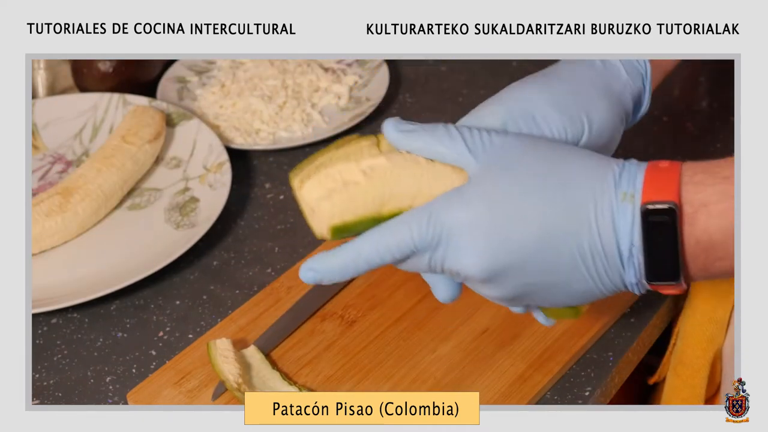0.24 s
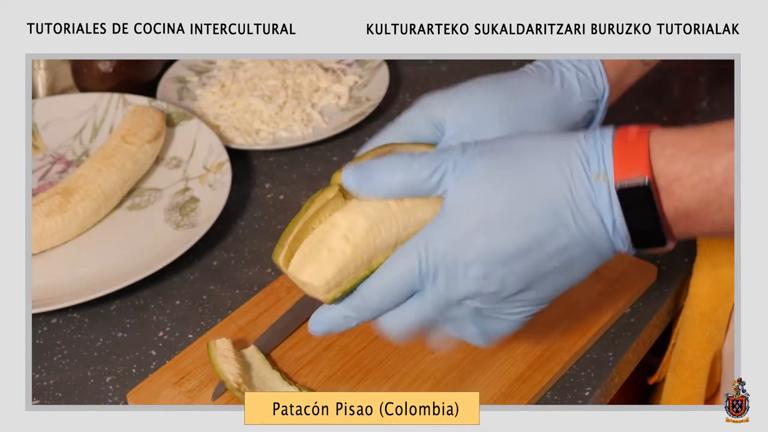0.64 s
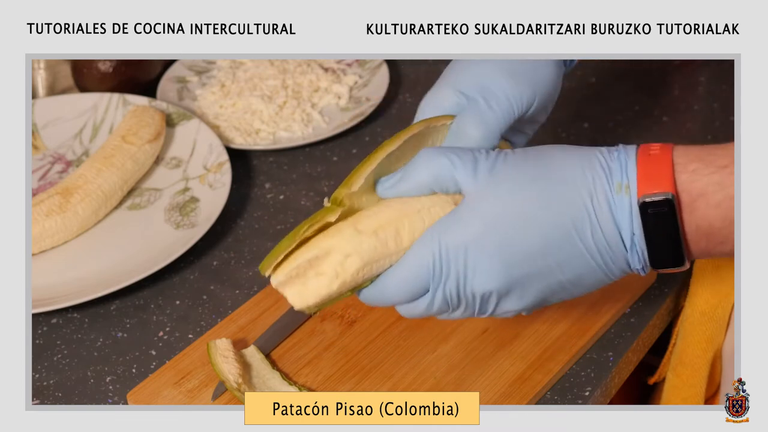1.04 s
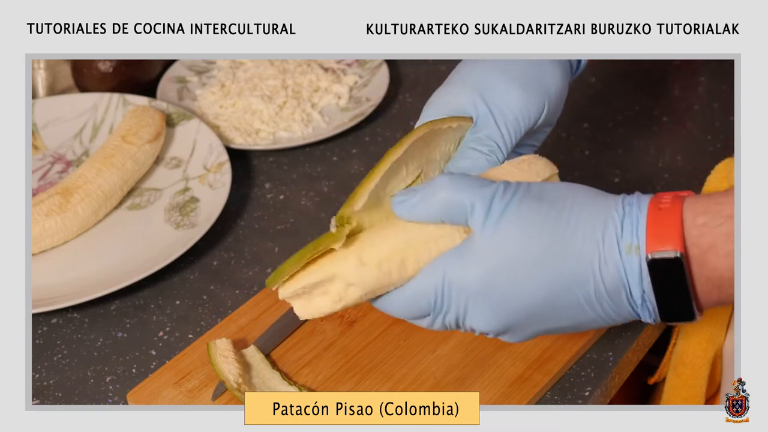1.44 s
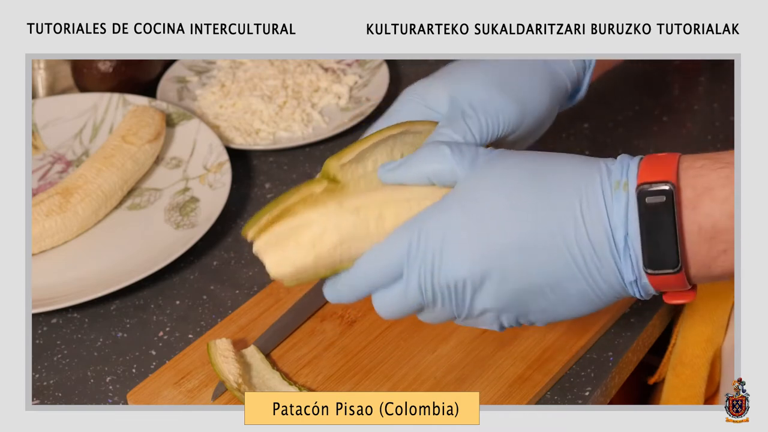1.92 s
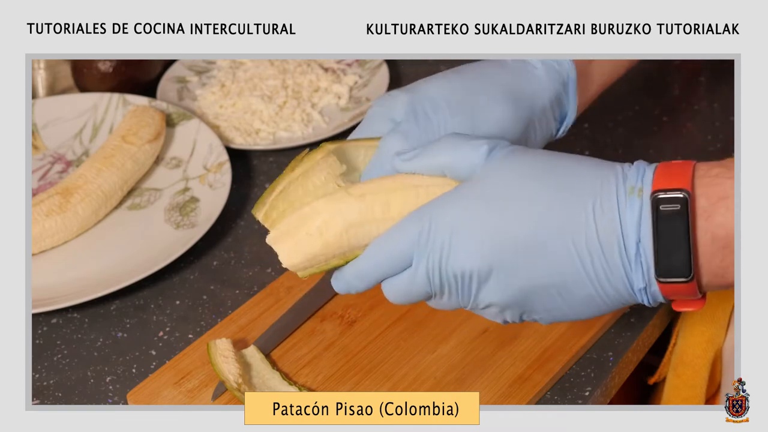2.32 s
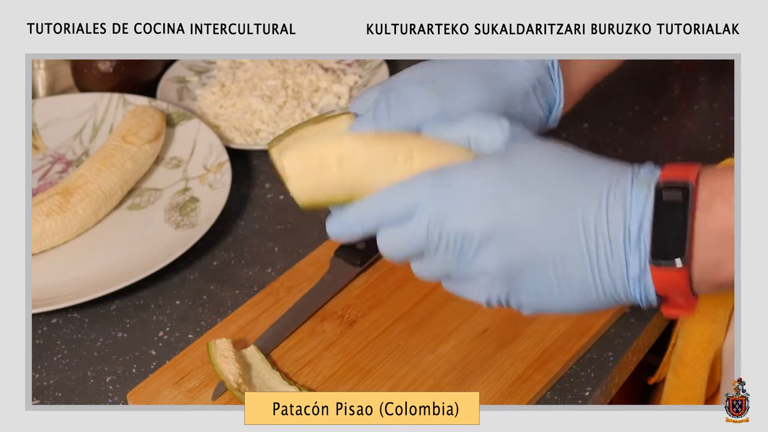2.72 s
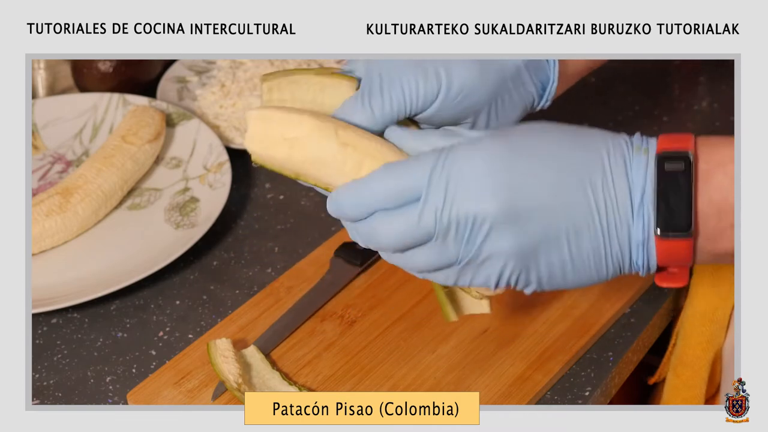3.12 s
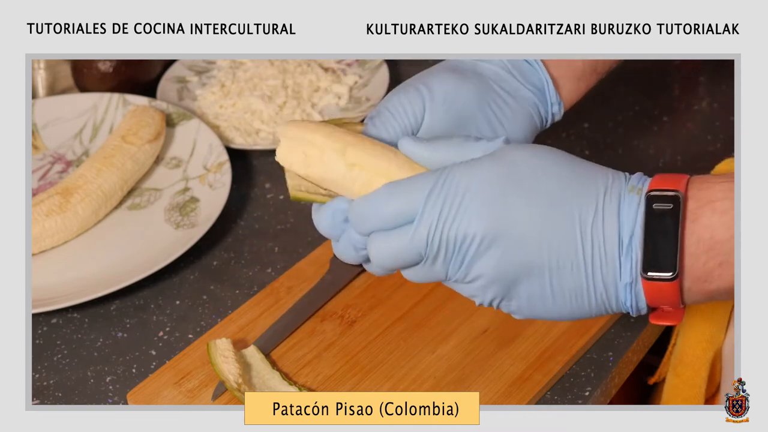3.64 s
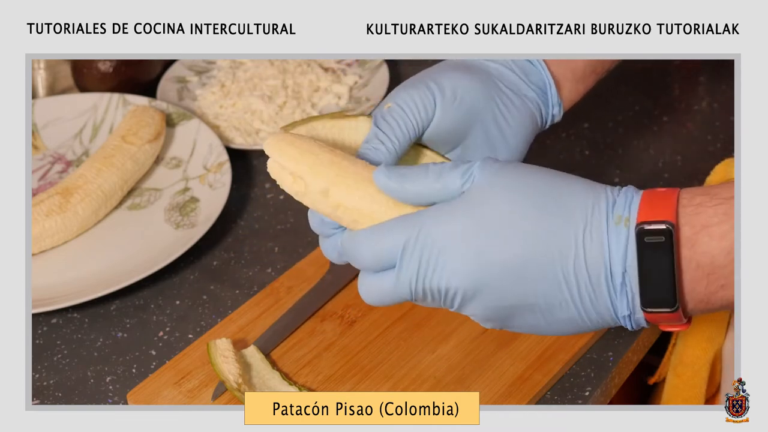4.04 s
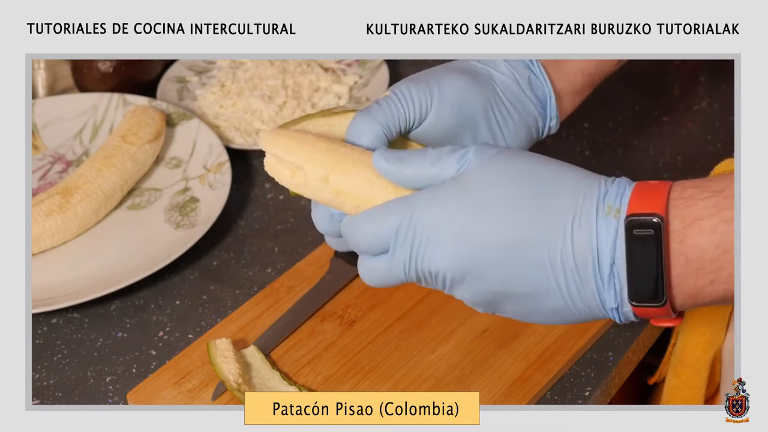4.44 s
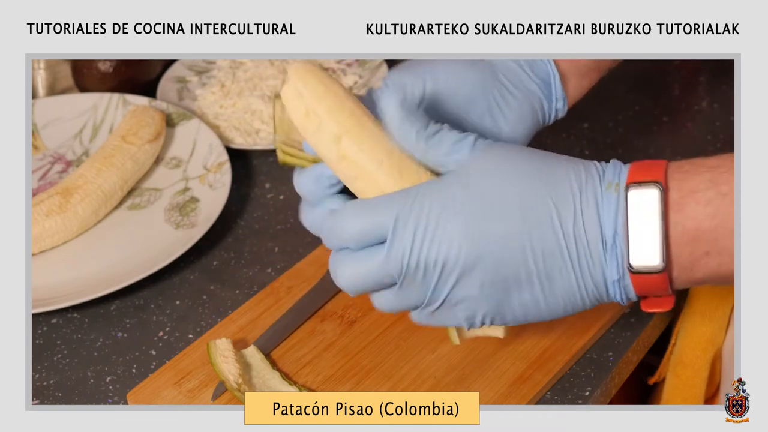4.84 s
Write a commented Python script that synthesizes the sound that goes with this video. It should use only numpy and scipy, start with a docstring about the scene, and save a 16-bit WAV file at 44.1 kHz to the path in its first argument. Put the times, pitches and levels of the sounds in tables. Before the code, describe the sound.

Stiff plantain skin is pried off by rubber-gloved hands, with crisp little snaps, short tearing crackles and soft glove rubs over faint room hum.

```python
"""Gloved fingers pry the stiff skin off a green plantain, close up in a small kitchen with a faint hum. First
the gloves rub and a strip tears loose, ringing lower as it grows: random breaks through a gliding resonance.
Throughout, fibres snap (noise cracks over damped skin modes) and bundles rip (short avalanches of breaks), most
densely between one and one and a half seconds. Around two seconds the hands bump the fruit (swelling sines) and
the gloves judder, then comes the heaviest snap. Crackling pulls and scattered snaps follow to the end; fading
noise tails answer as the room throughout."""
import sys
import numpy as np
from scipy import signal
from scipy.fft import rfft, irfft, next_fast_len
from scipy.io import wavfile
from scipy.ndimage import map_coordinates

SR = 44100
rng = np.random.default_rng(int(sys.argv[2]) if len(sys.argv) > 2 else 0)


def log_audio(samples):
    """Write samples as a 16-bit WAV file to the path given in sys.argv[1]."""
    # one column per channel
    frames = np.atleast_2d(samples).T
    # limit to full scale, then quantise
    limited = np.clip(frames, -1, 1)
    pcm = np.round(limited * 32767).astype(np.int16)
    wavfile.write(sys.argv[1], SR, pcm)


N = 223986  # length [samples]


def amp(db):
    """Decibels to gain."""
    return 10 ** (np.asarray(db) / 20)


def unit(x):
    """Scale to rms 1."""
    return x / np.sqrt(np.mean(x ** 2) + 1e-20)


def along(points, hz):
    """Read a curve of (frequency [Hz], value) points on a log frequency axis."""
    f, v = np.transpose(points)
    return np.interp(np.log(hz + 1), np.log(f + 1), v)


def wobble(rate):
    """A smooth random curve with rate knots a second."""
    knots = rng.standard_normal(int(N * rate / SR) + 4)
    return map_coordinates(knots, [np.arange(N) * rate / SR])


def filtered(x, response):
    """Shape x by a response given as a function of frequency."""
    m = next_fast_len(N + SR // 2)
    return irfft(rfft(x, m) * response(np.fft.rfftfreq(m, 1 / SR)), m)[:N]


def coloured(x, spectrum, size=2048):
    """Colour x with a causal minimum-phase filter of energy 1 that follows this spectrum."""
    cepstrum = irfft(np.log(amp(along(spectrum, np.fft.rfftfreq(size, 1 / SR)))))
    # folding the cepstrum forward in time puts the energy at the onset
    cepstrum[1:size // 2] *= 2
    cepstrum[size // 2 + 1:] = 0
    kernel = irfft(np.exp(rfft(cepstrum)))
    return signal.fftconvolve(x, kernel / np.linalg.norm(kernel))[:len(x)]


def resonated(x, hz, width_hz):
    """Ring x through one resonance, which may glide; about as strong as x."""
    turn = np.exp(2j * np.pi * np.cumsum(hz * np.ones(len(x))) / SR)
    pole = np.exp(-np.pi * width_hz / SR)
    ringing = turn * signal.lfilter([1], [1, -pole], x / turn)
    return np.sqrt(2 * (1 - pole ** 2)) * ringing.imag


def add(track, s, sound):
    """Mix a sound into the track at time s."""
    part = track[max(round(s * SR), 0):][:len(sound)]
    part += sound[:len(part)]


def fractures(size, per_second, spread_db):
    """Tiny breaks at random moments and of uneven sizes, rms 1."""
    happens = rng.random(size) < per_second / SR
    strength = amp(spread_db * np.clip(rng.standard_normal(size), -2, 2))
    return unit(happens * strength * rng.choice([-1, 1], size))


# the loudest single fibres breaking:
# (time [s], body level [dB], crack level [dB], crack brightness [dB per octave])
FIBRE_SNAPS = [(0.0499, -50, -45, -6.5), (0.283, -65, -44, 12), (0.321, -54, -49, 3),
               (0.363, -62, -47.5, 1), (0.5145, -28.5, -35, -9), (0.7845, -49, -52, -3),
               (0.9011, -51, -52, 0), (0.9374, -51, -50.5, 5), (1.0147, -50, -42, 0),
               (1.0222, -38, -38, -4), (1.0375, -41.5, -49, 6), (1.0686, -46, -54, 6),
               (1.111, -31, -37.5, -2), (1.1345, -34, -34.5, -2), (1.141, -44, -46, -8),
               (1.162, -31.5, -35, -1), (1.2138, -47, -50, -5), (1.2198, -40.5, -48, -6),
               (1.2395, -40, -38.5, 4), (1.2607, -40.5, -40, 0), (1.5098, -43, -47, -12),
               (1.517, -31.5, -38.5, -1), (1.5236, -37, -37.5, 1), (1.5522, -42.5, -53, -3),
               (2.283, -43, -39, 1), (2.3144, -21.5, -32.5, 0), (2.329, -52, -34.5, 1),
               (2.7001, -50, -44.5, 3), (2.729, -35.5, -40, 11), (3.2556, -45.5, -36, -5),
               (3.2709, -48, -38.5, -7), (3.294, -46, -40, 2), (3.304, -44, -33, -7),
               (3.3297, -49, -40, -2), (3.599, -56, -39, 3.5), (3.607, -59, -41.5, -2),
               (3.6469, -44, -49, 3), (3.7167, -45, -51, 2), (4.2345, -51.5, -58, 2), (4.303, -67, -49, 12),
               (4.5753, -49, -32.5, -5.5), (4.6336, -41, -39.5, -5), (4.6495, -47, -45.5, 0),
               (5.004, -50.5, -49, -2), (5.043, -53, -49.5, -2)]
# modes of the skin flexing as it lets go, before scatter and focus:
# (frequency [Hz], level [dB], decay by 60 dB [s])
SKIN_MODES = [(716, -3, 0.015), (1290, 3.5, 0.0075), (1850, 0.5, 0.0074), (2290, 5, 0.0028),
              (2860, 0.5, 0.012)]
# colour of a breaking fibre: (frequency [Hz], relative density [dB per Hz])
CRACK_COLOUR = [(300, -55), (900, -19.5), (2000, -7), (3300, 5), (4800, 2.5), (6000, 9), (7100, 4.5),
                (8800, 6), (12000, 1.5), (16000, -13)]
# a harder snap frees a bigger piece, which sounds lower:
# centre of the body [Hz] at a middling strength [dB], and its fall [octaves per dB]
PIECE_HZ, PIECE_DB, PIECE_OCTAVES_PER_DB = 1500, -39, 0.028


def snaps(rise=.0005, crack_t60=0.0039, splinter_db=-18, splinter_t60=0.041, pivot_hz=7000,
          pitch_scatter=0.043, focus_db=6, low_hz=400):
    """Each fibre breaks with a sharp crack and kicks the heavily damped skin."""
    out, t = np.zeros(N), np.arange(SR // 25) / SR
    blow_samples = .003 * SR
    # the skin is a small radiator and gives little bass
    small_radiator = signal.butter(2, low_hz, "highpass", fs=SR)

    def as_blow(x):
        """Scale to rms 1 as if it all fell within 3 ms."""
        return x * np.sqrt(blow_samples) / np.linalg.norm(x)

    # the break runs across the fibre, then the cell walls beside it splinter
    decay = amp(-60 * t / crack_t60) + amp(splinter_db - 60 * t / splinter_t60)
    breaking = (1 - np.exp(-t / rise)) * decay
    for s, body, crack, brightness in FIBRE_SNAPS + thin_fibres():
        # the size of the broken piece decides which modes take the kick
        centre = PIECE_HZ * 2 ** (PIECE_OCTAVES_PER_DB * (PIECE_DB - body))
        flex = np.zeros(len(t))
        for hz, db, t60 in SKIN_MODES:
            level = db + rng.normal(0, 1) - focus_db * np.log2(hz / centre) ** 2
            pitch = hz * np.exp(pitch_scatter * rng.normal())
            flex += amp(level - 60 * t / t60) * np.sin(2 * np.pi * pitch * t)
        add(out, s, amp(body) * as_blow(signal.lfilter(*small_radiator, flex)))
        # each fibre tilts the crack colour about the pivot
        spectrum = [(hz, db + brightness * np.log2(hz / pivot_hz)) for hz, db in CRACK_COLOUR]
        noise = breaking * rng.standard_normal(len(t))
        add(out, s - rise, amp(crack) * as_blow(coloured(noise, spectrum)))
    return out


# pulls on the skin: (start [s], length [s], crackle level before the trim in peeling [dB])
SKIN_PULLS = [(0.02, 0.058, -56.5), (0.295, .13, -56.5), (0.45, 0.076, -49.5), (0.665, 0.024, -59.5),
              (0.9, 0.28, -64.5), (1.225, 0.023, -51), (2.195, 0.049, -50.5), (2.68, 0.12, -59.5),
              (3.22, .12, -58), (3.52, 0.081, -61), (4.305, 0.068, -61.5), (4.515, 0.076, -57.5),
              (4.995, 0.046, -58)]
# how often thin fibres part during a pull [per s], body and crack over the pull's level [dB],
# brightness [dB per octave], and range from the weakest to the strongest [dB]
THIN_PER_S, THIN_BODY_DB, THIN_CRACK_DB, THIN_DB_PER_OCTAVE = 40, -1.5, 1, 2.5
THIN_SPREAD_DB = 5


def thin_fibres():
    """Thin fibres part at random over each pull: faint snaps, as rows like those of FIBRE_SNAPS."""
    rows = []
    for start, length, db in SKIN_PULLS:
        chances = rng.random((40, 3))
        for place, happens, size in chances:
            if happens < THIN_PER_S * length / len(chances):
                level = db + THIN_SPREAD_DB * (size - .5)
                rows.append((start + place * length, level + THIN_BODY_DB, level + THIN_CRACK_DB,
                             THIN_DB_PER_OCTAVE))
    return rows


# bundles of fibres giving way: (time [s], length [s], body level [dB], crack level [dB],
# ring of the freed strip [Hz], ring level [dB])
BUNDLE_RIPS = [(0.509, 0.0086, -30.5, -43, 1830, -43.5), (1.142, 0.0066, -42, -45, 6040, -39.5),
               (1.232, 0.022, -52, -65, 2030, -46.5), (1.514, 0.018, -47, -60, 1320, -39),
               (2.326, 0.01, -38, -48, 1200, -38), (2.708, 0.021, -50.5, -44.5, 4600, -47.5),
               (2.724, 0.019, -46, -36.5, 4370, -42.5), (2.751, 0.024, -48, -48.5, 1430, -83),
               (3.297, 0.0098, -48, -47, 6450, -47.5), (3.326, 0.0049, -42.5, -36.5, 6600, -40.5),
               (3.626, 0.0061, -40.5, -39.5, 8700, -66), (3.636, 0.01, -37, -38.5, 5040, -43),
               (4.301, 0.013, -66, -55.5, 11400, -58), (4.577, 0.025, -41, -44, 1480, -56),
               (5.027, 0.022, -64, -61, 1450, -55.5)]
# colour of a tear's body: (frequency [Hz], relative density [dB per Hz])
TEAR_COLOUR = [(100, -23), (250, -6), (500, -7.5), (850, -1), (1300, -5.5), (1800, -7), (2500, -4.5),
               (3500, -12), (7000, -19.5)]


def rips(rise=0.00085, release_t60=0.031, ring_width_hz=420):
    """A tear runs through a bundle: a short avalanche of breaks that rings the freed strip."""
    out, t = np.zeros(N), np.arange(SR // 10) / SR
    for s, length, body, crack, ring_hz, ring in BUNDLE_RIPS:
        strain = (1 - np.exp(-t / rise)) * amp(-60 * np.maximum(t - length, 0) / release_t60)
        breaks = strain * fractures(len(t), per_second=3600, spread_db=2.0)
        # rms 1 if it all fell within the rip's length
        breaks *= np.sqrt(length * SR) / np.linalg.norm(breaks)
        add(out, s, amp(body) * coloured(breaks, TEAR_COLOUR))
        add(out, s, amp(crack) * coloured(breaks, CRACK_COLOUR))
        add(out, s, amp(ring) * resonated(breaks, ring_hz, ring_width_hz))
    return out


# the first strip comes loose and rings lower as it lengthens: (time [s], ring [Hz], level [dB])
LOOSE_STRIP = [(.28, 3200, -91), (.32, 2850, -56.5), (.41, 2600, -58.5), (.46, 2240, -48), (.5, 1950, -56),
               (.52, 1850, -80)]
# the pulp under the tearing strip: (frequency [Hz], width [Hz], level against the strip [dB])
PULP = (710, 77, -8)


def strip():
    """Steady tearing rings a strip of skin that grows longer, and the pulp beneath it."""
    s, hz, db = np.transpose(LOOSE_STRIP)
    t = np.arange(N) / SR
    breaks = fractures(N, per_second=1500, spread_db=5.5)
    pulp_hz, pulp_width, pulp_db = PULP
    ring = resonated(breaks, np.interp(t, s, hz), width_hz=380)
    ring += amp(pulp_db) * resonated(breaks, pulp_hz, pulp_width)
    tearing = (t > s[0]) * (t < s[-1])
    return amp(np.interp(t, s, db)) * tearing * ring


# the gloves shift their grip: (middle [s], half length [s], rub level before the trim [dB])
GRIP_SHIFTS = [(0.063, 0.1, -58), (0.45, 0.14, -55), (0.673, 0.064, -59), (0.847, 0.033, -57),
               (1.707, 0.025, -53), (1.878, 0.011, -53.5), (2.17, 0.22, -56.5), (2.438, 0.14, -59),
               (3.438, 0.049, -58), (3.625, 0.11, -60.5), (3.852, 0.062, -57), (4.253, 0.14, -64),
               (4.726, .1, -65)]
# colours of rubbing glove and parting cells: (frequency [Hz], relative density [dB per Hz])
RUB_COLOUR = [(70, -23.5), (150, 0.5), (290, 5.5), (450, -3), (780, -0.5), (1400, -5), (2400, -13.5),
              (3500, -10.5), (7000, -38)]
FIZZ_COLOUR = [(1000, -45), (2500, -4), (4000, -2), (6500, -1), (9500, 2.5), (12500, -4.5), (16000, -12.5)]
PULL_ATTACK_S, PULL_RELEASE_S = 0.051, 0.048  # time to rise and to fall by 20 dB
HOLD_RUB_DB, HOLD_CRACKLE_DB = -69, -77  # the fruit merely held, before the trim


def peeling(rub_trim_db=-2, crackle_trim_db=-2):
    """Skin parts from flesh in fine crackle at each pull; gloves drag over it at each change of grip."""
    t = np.arange(N) / SR
    # overlapping gestures add as power
    rub_power = amp(HOLD_RUB_DB) ** 2 * np.ones(N)
    for s, half, db in GRIP_SHIFTS:
        rub_power += (amp(db) * np.exp(-((t - s) / half) ** 2)) ** 2
    crackle_power = amp(HOLD_CRACKLE_DB) ** 2 * np.ones(N)
    for s, length, db in SKIN_PULLS:
        before = np.maximum(s - t, 0) / PULL_ATTACK_S
        after = np.maximum(t - s - length, 0) / PULL_RELEASE_S
        crackle_power += amp(db - 20 * (before + after)) ** 2
    drag = coloured(fractures(N, per_second=2500, spread_db=0.5), RUB_COLOUR)
    cells = coloured(fractures(N, per_second=650, spread_db=3.5), FIZZ_COLOUR)
    rub = amp(rub_trim_db) * np.sqrt(rub_power) * drag
    return rub + amp(crackle_trim_db) * np.sqrt(crackle_power) * cells


# glove rubber juddering over the fruit: (middle [s], half length [s], pitch [Hz], level [dB])
GLOVE_SLIDES = [(0.377, 0.044, 257, -61.5), (2.02, 0.016, 278, -56), (2.053, 0.015, 794, -54),
                (2.16, 0.094, 287, -56), (3.45, 0.058, 440, -61.5), (3.843, 0.057, 282, -62)]


def slides(width_hz=70):
    """Rubber sticks and slips in quick tiny jerks, each slide around its own pitch."""
    out, t = np.zeros(N), np.arange(N) / SR
    for s, half, hz, db in GLOVE_SLIDES:
        jerks = fractures(N, per_second=1200, spread_db=1.5)
        out += amp(db) * np.exp(-((t - s) / half) ** 2) * resonated(jerks, hz, width_hz)
    return out


# soft bumps of the hands on the fruit:
# (middle [s], level of the swell [dB], pitch [Hz], half length [s])
HAND_BUMPS = [(.222, -41.5, 242, 0.0033), (.85, -57, 81, 0.014), (1.889, -59, 100, 0.0073),
              (1.995, -35, 145, 0.0077), (2.003, -37.5, 274, 0.008), (2.075, -55, 130, 0.011),
              (3.85, -60, 82.6, 0.04), (4.212, -44, 153, 0.0072)]
# colour of a padded contact: (frequency [Hz], relative density [dB per Hz])
KNOCK_COLOUR = [(100, -1), (300, 1), (600, 1), (1100, -17), (1800, -33), (5000, -54)]


def bumps(knock_db=-11, knock_share=0.36):
    """Padded contacts: a few cycles that swell and die, with a brief dull knock at the peak."""
    out, t = np.zeros(N), np.arange(N) / SR
    knock = amp(knock_db) * coloured(rng.standard_normal(N), KNOCK_COLOUR)
    for s, db, hz, half in HAND_BUMPS:
        phase = (t - s) / half
        swell = np.exp(-phase ** 2) * np.sin(2 * np.pi * hz * (t - s))
        out += amp(db) * (swell + knock * np.exp(-(phase / knock_share) ** 2))
    return out


# decay of the kitchen: (frequency [Hz], decay by 60 dB [s])
KITCHEN_DECAY = [(200, 0.31), (1200, 0.15), (4000, 0.24), (9000, 0.2), (16000, 0.096)]
# strength of the kitchen's answer, before the hollows: (frequency [Hz], level [dB])
KITCHEN_ANSWER = [(150, -7), (500, -4), (900, -3), (1650, -1.5), (3000, -2), (6000, -3), (15000, 2)]
# resonances among the plates and worktop: (frequency [Hz], width [Hz], level [dB])
KITCHEN_HOLLOWS = [(708.4, 14.4, 3.5), (908, 13, 7.5), (1177, 65, 6), (1337, 41, 7), (1486, 44, 3),
                   (1777, 31, -16)]


def kitchen(x, build_up=0.0032, count=8):
    """Worktop and walls answer with fading noise tails, crossfaded in turn as the hands move."""
    out = np.zeros(N)
    place = np.linspace(0, count - 1, N)
    for k in range(count):
        hz, t, z = signal.stft(rng.standard_normal(SR // 3), SR, nperseg=256)
        decay = amp(-60 * t / along(KITCHEN_DECAY, hz)[:, None])
        tail = signal.istft(z * decay, SR, nperseg=256)[1]
        tail *= 1 - np.exp(-np.arange(len(tail)) / SR / build_up)
        share = np.maximum(1 - abs(place - k), 0)
        out += signal.fftconvolve(x * share, tail / np.linalg.norm(tail))[:N]

    def response(f):
        """The overall answer with the hollows ringing on top."""
        hollows = 1 + sum(amp(db) * 1j * f * w / (c * c - f * f + 1j * f * w)
                          for c, w, db in KITCHEN_HOLLOWS)
        return amp(along(KITCHEN_ANSWER, f)) * hollows

    return filtered(out, response)


# colour of the room noise: (frequency [Hz], relative density [dB per Hz])
AIR_COLOUR = [(15, -38), (25, -10), (102, -9.5), (166, -6.5), (223, -10), (270, -8), (326, -5), (531, -16),
              (659, -8.5), (1230, -8.5), (1700, -15.5), (1840, -16.5), (2280, -16), (9320, -24.5),
              (16000, -40.5)]
# mains hum and appliance motor, before the waver: (frequency [Hz], rms level [dB])
HUM_TONES = [(49.5, -77.5), (100.5, -72.5), (221, -81), (331, -67.5)]


def background(air_db=-59, waver_db=0.5, drift=0.35):
    """Steady room noise under hum tones that waver in level and drift in phase [rad]."""
    t = np.arange(N) / SR
    air = unit(filtered(rng.standard_normal(N), lambda hz: amp(along(AIR_COLOUR, hz))))
    hum = np.zeros(N)
    for hz, db in HUM_TONES:
        level = amp(db + waver_db * wobble(4.94)) * np.sqrt(2)
        hum += level * np.sin(2 * np.pi * hz * t + drift * wobble(7.2))
    return amp(air_db) * air + hum


def scene():
    """The peeling in its room: dry sources, the kitchen's answer to them, and the background."""
    snap, rip = snaps(), rips()
    peel = peeling() + strip() + slides()
    bump = bumps()
    room = kitchen(amp(-3.5) * snap + amp(-7.5) * rip + amp(-3.5) * peel + amp(-8) * bump)
    return (snap + rip + peel + bump + room + background())[None]


def record(dry, low_hz=36, top_hz=16200):
    """Roll off the deepest bass and cut steeply above the top of the band."""
    voiced = signal.lfilter(*signal.butter(2, low_hz, "highpass", fs=SR), dry[0])
    return filtered(voiced, lambda hz: 1 / (1 + (hz / top_hz) ** 160))[None]


dry = scene()
out = record(dry)
log_audio(out)
```